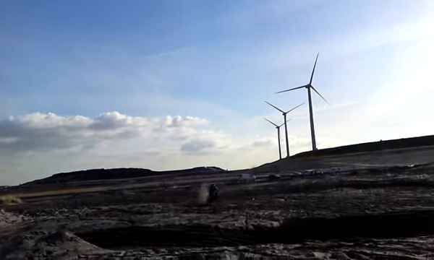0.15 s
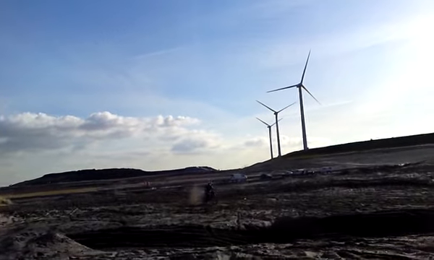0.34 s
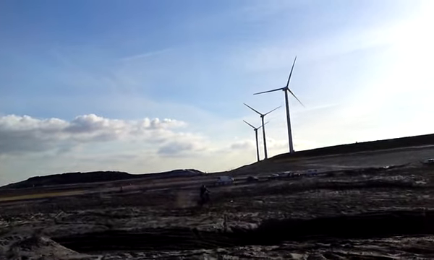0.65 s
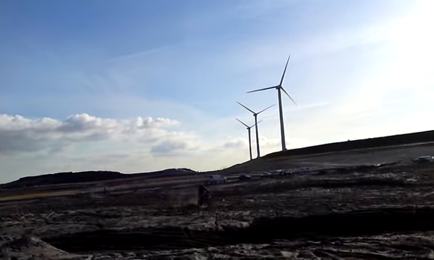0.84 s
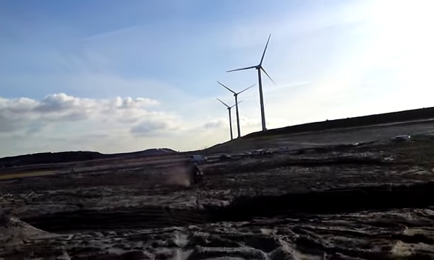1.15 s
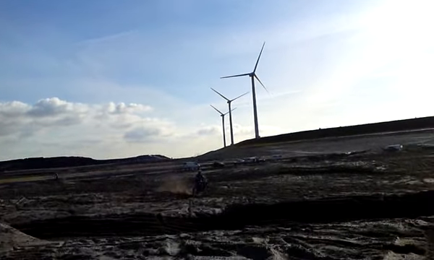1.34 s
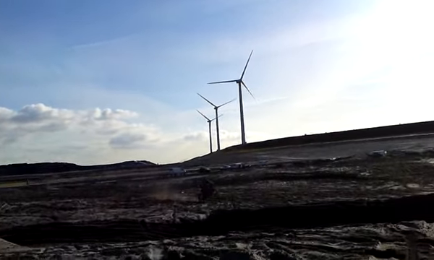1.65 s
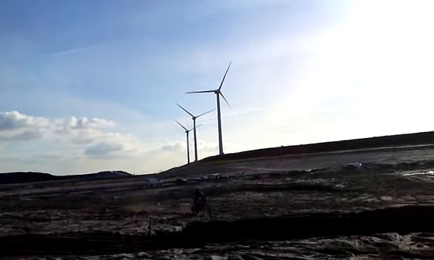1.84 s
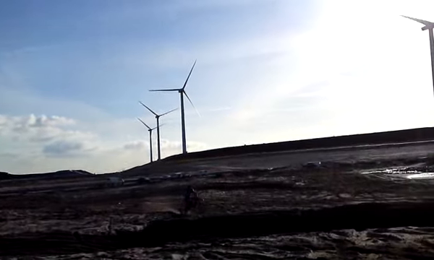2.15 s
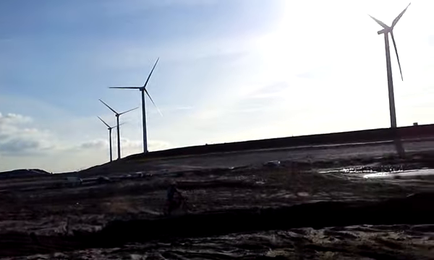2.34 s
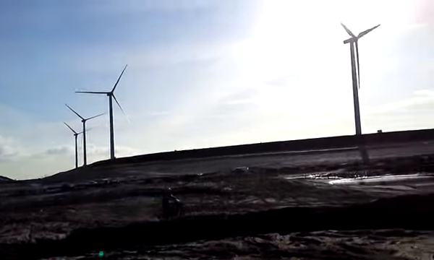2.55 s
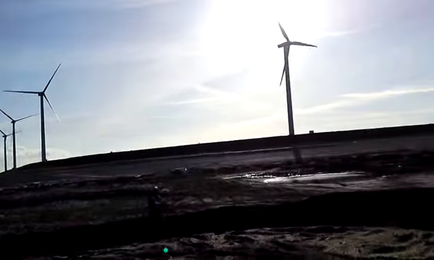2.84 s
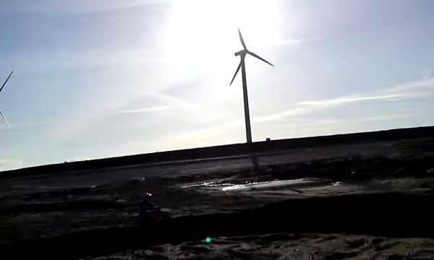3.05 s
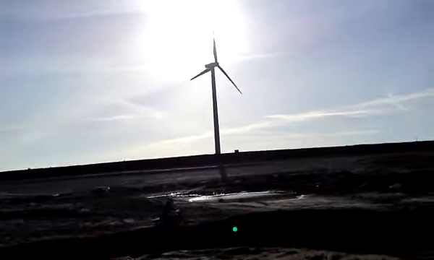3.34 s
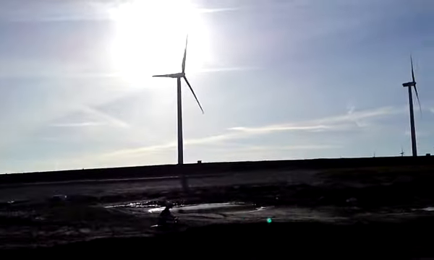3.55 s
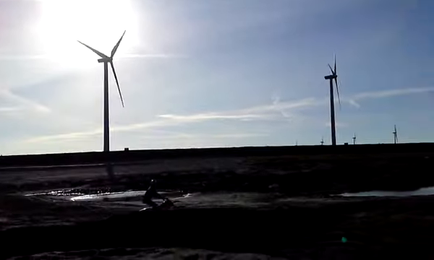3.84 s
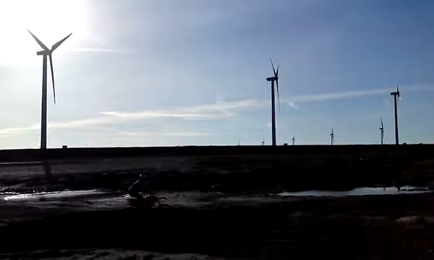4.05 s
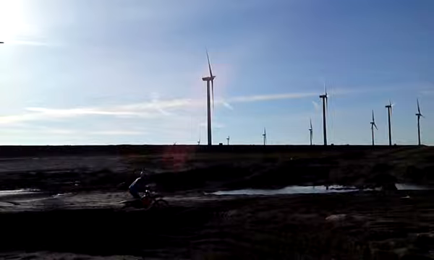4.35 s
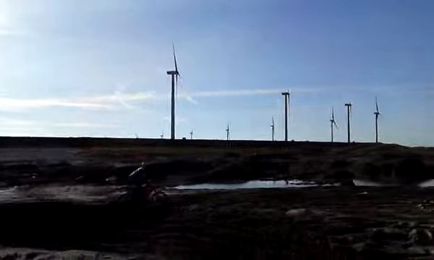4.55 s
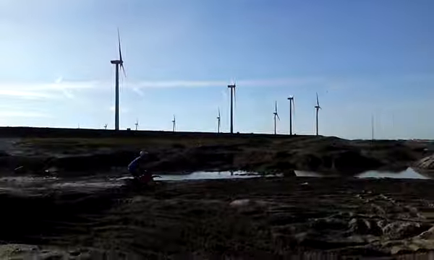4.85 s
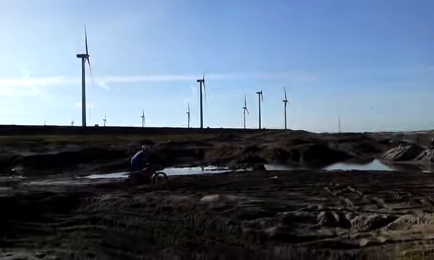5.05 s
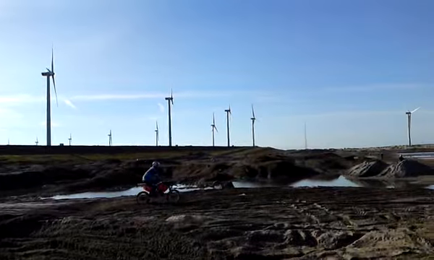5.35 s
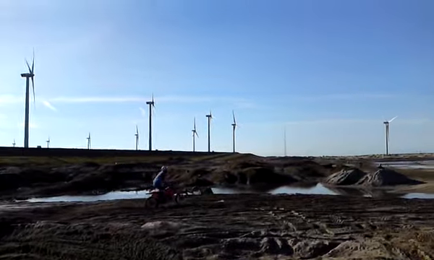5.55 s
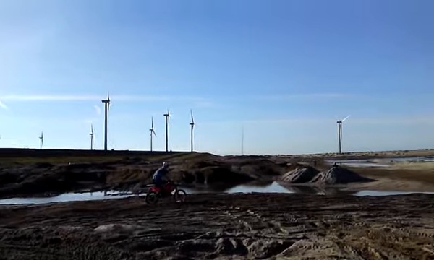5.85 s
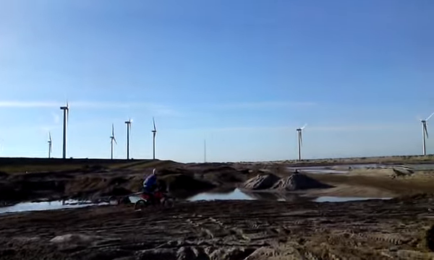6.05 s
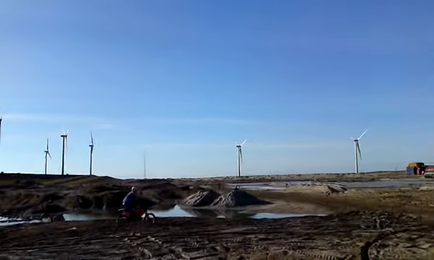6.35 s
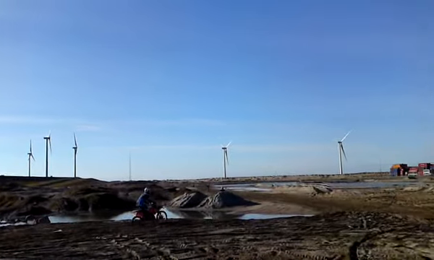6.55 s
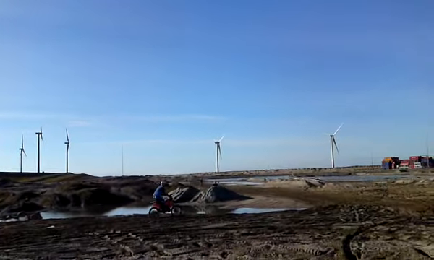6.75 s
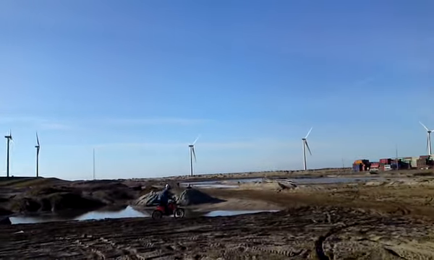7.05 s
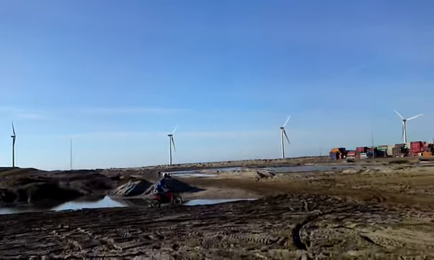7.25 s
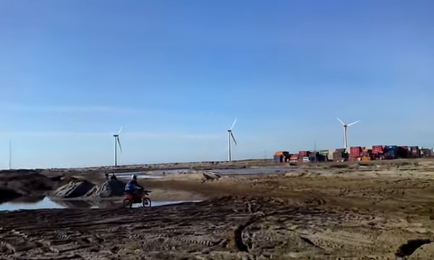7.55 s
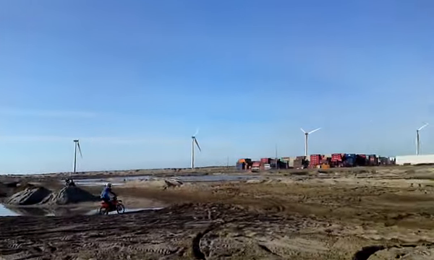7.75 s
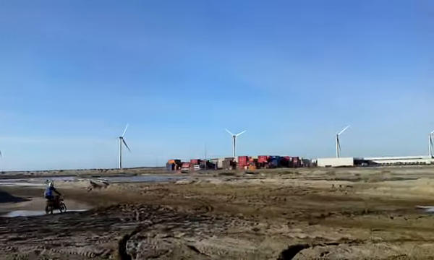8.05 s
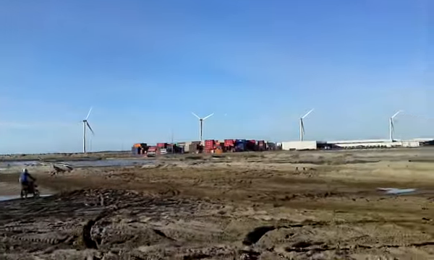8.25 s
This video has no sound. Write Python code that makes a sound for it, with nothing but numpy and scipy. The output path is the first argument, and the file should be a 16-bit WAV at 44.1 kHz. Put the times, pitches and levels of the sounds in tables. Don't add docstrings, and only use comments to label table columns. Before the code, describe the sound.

Harsh buzzing two-stroke motorcycle revs up and sags, crackles past on part throttle, then recedes over faint wind and distant traffic.

```python
import sys
import numpy as np
from scipy import signal
from scipy.io import wavfile
from scipy.ndimage import uniform_filter1d, minimum_filter1d

SR = 44100
rng = np.random.default_rng(int(sys.argv[2]) if len(sys.argv) > 2 else 0)


def level_to_linear(level):
    exponent = np.asarray(level, float) / 20
    return 10 ** exponent


def int16_out(signal):
    q = np.round(np.clip(np.atleast_2d(signal).T, -1, 1) * 32767)
    wavfile.write(sys.argv[1], SR, q.astype(np.int16))


N = 369558

# [f/Hz, bandwidth/Hz, level/dB]
PIPE_MODES = [(320, 163, -8.5), (700, 213, -1), (895, 320, -1), (1080, 320, -1), (1344, 300, -3.5),
              (1920, 45, 0)]
# [t/s, heading (0 coming, 1 side-on, 2 leaving)]
HEADING_PATH = [(0, 0), (1, 0.44), (2.9, 0.43), (3.5, 0.85), (6.3, 0.85), (6.9, 1.22), (7.6, 1.5),
                (8.4, 2.5)]


def rms_one(x):
    return x / np.sqrt(np.mean(x ** 2) + 1e-20)


def even(x, span_s):
    return x / np.sqrt(uniform_filter1d(x * x, int(span_s * SR)) + 1e-12)


def in_time(rows):
    s, *columns = np.transpose(rows)
    return [np.interp(np.arange(N) / SR, s, c) for c in columns]


def drift(rate):
    step, settle = 40, 2000
    r = np.exp(-2 * np.pi * step * rate / SR)
    white = rng.standard_normal(N // step + settle + 2)
    slow = signal.lfilter([1], [1, -2 * r, r * r], white)[settle:]
    return np.interp(np.arange(N) / step, np.arange(len(slow)), rms_one(slow))


def resonate(x, hz, width_hz):
    r = np.exp(-np.pi * width_hz / SR)
    poles = [1, -2 * r * np.cos(2 * np.pi * hz / SR), r * r]
    return signal.lfilter(np.array([1, 0, -1]) * (1 - r * r) / 2, poles, x + 1e-18)


def bands(spectra, blend, low_hz, step, count, patchy_db):
    edges = low_hz * 2 ** (step * np.arange(count + 1))
    centres = np.sqrt(edges[1:] * edges[:-1])
    white = rng.standard_normal((2, N))
    out = np.empty((count, N))
    level_db = np.array([np.interp(np.log(centres), np.log(hz), db) for hz, db in map(np.transpose, spectra)])
    for k in range(count):
        blended_db = np.interp(blend, np.arange(len(spectra)), level_db[:, k])
        gain = level_to_linear(blended_db + patchy_db * drift(9.0))
        band = signal.butter(2, edges[k:k + 2], "band", fs=SR, output="sos")
        out[k] = gain * signal.sosfilt(band, white[k % 2])
    return centres, out


def ground():
    # [f/Hz, level/dB per Hz]
    ground_spectrum = [(15, -47), (25, 8), (129, 3), (487, -13), (686, -3.5), (1790, -2), (2230, -5.5),
                       (4540, 2), (6720, -41.5), (7780, -10), (8800, -27), (11400, -57), (19400, -120)]
    noise = bands([ground_spectrum], 0, 29.85, step=1 / 2, count=16, patchy_db=3.0)[1]
    return level_to_linear(-37) * rms_one(noise.sum(0))


def far_engine():
    # [t/s, f/Hz, level/dB]
    far_drone = [(7.08, 189.4, -57), (7.114, 183.5, -49), (7.174, 212.7, -49.5), (7.26, 216, -52),
                 (7.55, 202.8, -49)]
    hz, level_db = in_time(far_drone)
    s = np.arange(N) / SR
    fade_in = np.clip((s - far_drone[0][0]) / 0.051, 0, 1)
    fade_out = np.clip((far_drone[-1][0] - s) / 0.057, 0, 1)
    angle = 2 * np.pi * np.cumsum(hz) / SR
    orders = np.sin(angle) + level_to_linear(-2.0) * np.sin(2 * angle)
    return fade_in * fade_out * level_to_linear(level_db + 4.5) * orders


def throttle():
    # [open t/s, end t/s, rasp level at open/dB, rasp level
    # at end/dB, crank at end f/Hz]
    throttle_pulls = [(0, .28, -24.5, -40, 79.9), (.28, .49, -31, -29, 82.1), (.49, .77, -32.5, -34, 75.3),
                      (.77, .93, -30.5, -20, 83.03), (.93, 1.15, -19, -13.5, 108), (1.15, 1.21, -11, -9, 148),
                      (1.21, 1.31, -9.5, -8, 160.1), (1.31, 1.59, -8.5, -11, 148),
                      (1.59, 1.84, -12, -4.5, 162), (1.84, 1.975, -2, -10, 164.6),
                      (2.15, 2.36, -17, -8, 116.1), (2.36, 2.555, -6.5, -10.5, 153.7),
                      (2.625, 2.78, -12.5, -8, 152.1), (2.78, 2.87, -12.5, -13, 140),
                      (3.43, 3.685, -30.5, -25, 88), (3.83, 4.159, -25, -24, 108.1),
                    (4.25, 4.558, -35, -37, 70.8), (4.561, 4.73, -27.5, -25, 70.84),
                    (4.96, 5.2, -32, -25, 77.2), (5.199, 5.44, -24, -27.5, 64.1),
                    (5.5, 5.79, -22.5, -16.5, 82.9), (5.789, 6.049, -17, -27.5, 65.76),
                    (6.08, 6.26, -22, -19, 76), (6.259, 6.49, -19.5, -8, 111.3),
                    (6.49, 6.633, -7.5, -18, 83.07), (7.4, 7.621, -34, -23, 58.7),
                    (7.62, 7.951, -26.5, -24, 66.5), (7.949, 8.399, -27, -28.5, 59.16)]
    start_hz, idle_hz, sag_s = 87.06, 70.75, .15
    shut_drop_db, shut_s, fade_db_per_s, coast_db = 5.5, 0.0073, 86.5, -38.5
    s, hz, db = np.arange(N) / SR, np.full(N, start_hz), np.zeros(N)
    pulls = throttle_pulls
    next_opens = [pull[0] for pull in pulls[1:]] + [N / SR]
    for (open_s, end_s, open_db, end_db, end_hz), next_s in zip(pulls, next_opens):
        part = slice(max(int(open_s * SR), 0), int(next_s * SR) + 1)
        shut = np.maximum(s[part] - end_s, 0)
        sag = np.exp(-shut / sag_s)
        driven_hz = np.interp(s[part], [open_s, end_s], [hz[part][0], end_hz])
        hz[part] = sag * driven_hz + (1 - sag) * idle_hz
        fall_db = shut_drop_db * (1 - np.exp(-shut / shut_s)) + fade_db_per_s * shut
        db[part] = np.maximum(np.interp(s[part], [open_s, end_s], [open_db, end_db]) - fall_db, coast_db)
    return uniform_filter1d(hz, size=900), uniform_filter1d(db, size=300)


def whine(turn):
    # [t/s, level/dB]
    whine_levels = [(6.72, -72), (6.9, -49), (7.3, -55), (7.5, -63), (7.9, -55), (8.4, -73)]
    pull_away_s = 7.5
    away = np.clip((np.arange(N) / SR - pull_away_s) / .3, 0, 1)
    flutter = away * 9 * drift(60)
    teeth = np.sin(20 * np.pi * turn) + flutter * np.sin(60 * np.pi * turn)
    return level_to_linear(in_time(whine_levels)[0]) * teeth


def burns():
    # [first t/s, last t/s, first peak level/dB, last peak level/dB, pipe bark level/dB]
    burn_runs = [(.0024, 0.1157, -7, -6.5, -34), (.1804, 0.277, -9, -10, -40),
                 (0.3187, 0.464, -12.5, -10.5, -32.5), (0.515, 0.8343, -14, -9.5, -32.5),
                 (0.8605, .908, -11.5, -7.5, -37), (0.98, 1.03, -10, -8, -42),
                 (3.1624, 3.2983, -17, -20.5, -38), (3.4307, 3.497, -20, -16.5, -33),
                 (3.577, 3.673, -13, -13, -26.5), (3.8303, 3.872, -12, -15, -24),
                 (4.2104, 4.281, -10.5, -11.5, -30), (4.32, 4.387, -12.5, -9.5, -28.5),
                 (4.567, 4.65, -7.5, -9.5, -22.5), (4.685, 4.723, -5.5, -10.5, -27.5),
                 (4.831, 4.895, -16, -12, -31), (4.958, 5.113, -10, -9.5, -24.5),
                 (5.1575, 5.3178, -7.5, -4, -25.5), (5.378, 5.502, -5.5, -7, -28),
                 (5.667, 6.052, -2.5, -6, -26), (6.24, 6.3345, -4.5, -3, -27),
                 (6.9716, 7.007, -19, -21.5, -42), (7.3341, 7.411, -6, -8, -30.5),
                 (7.4716, 7.5963, -13.5, -19, -41)]
    burn_counts = [3, 3, 5, 9, 3, 2, 3, 3, 2, 2, 2, 2, 3, 2, 2, 6, 5, 5, 11, 3, 2, 2, 3]
    # [t/s, peak level/dB, pipe bark level/dB]
    lone_burns = [(4.9244, -25, -29), (2.151, -4, -38), (2.578, -7, -37), (5.3463, -15, -35),
                  (6.6013, 2.5, -25), (6.7868, -21, -38), (7.9677, -22, -45), (8.0307, -11.5, -46)]
    rows = []
    for (first, last, db_0, db_1, bark_db), count in zip(burn_runs, burn_counts):
        for u in np.linspace(0, 1, num=count):
            rows.append((first + (last - first) * u, db_0 + (db_1 - db_0) * u, bark_db, 0 < u < 1))
    rows = np.array(rows)
    scatter_db = rng.standard_normal((len(rows), 2)) * [1.0, 2.0] * rows[:, 3:]
    return np.vstack([np.column_stack([rows[:, 0], rows[:, 1:3] + scatter_db]), lone_burns])


def struck(pops, column, offset_db):
    clicks = np.zeros(N)
    clicks[(pops[:, 0] * SR).astype(int)] = level_to_linear(pops[:, column] + offset_db)
    return clicks


def cone(hits):
    end_hz, fall_hz, fall_s, ring_s = 640, 434, .009, .011
    s = np.arange(SR // 20) / SR
    cycles = end_hz * s + fall_hz * fall_s * (1 - np.exp(-s / fall_s))
    ring = level_to_linear(-37.5) * np.exp(-s / ring_s) * np.sin(2 * np.pi * cycles)
    crack = level_to_linear(-25) * np.exp(-s / .00008)
    return signal.oaconvolve(hits, ring + crack)[:N]


def singing(turn, hz):
    out = 0
    for k in range(4, 13):
        pipe = sum(level_to_linear(db) / (1 + (2 * (k * hz - f) / width) ** 2) ** 2 for f, width, db in PIPE_MODES)
        rolloff = np.minimum(600 / (k * hz), 1) ** 1.4
        tone = np.sin(2 * np.pi * (k * turn + rng.random()))
        out = out + pipe * rolloff * level_to_linear(3.5 * drift(5)) * tone
    return even(out, 0.28)


def ring_pipe(x):
    out = 0
    for k, (f, width, db) in enumerate(PIPE_MODES):
        out = out + (-1) ** k * level_to_linear(db) * resonate(resonate(x, f, width), f, 2 * width)
    return out


def exhaust(turn, hz, pops, rough, bark_db, boom_db):
    boom_hz, boom_width_hz = 184, 42
    port = np.diff(np.floor(turn), prepend=0)
    strength = 1 + rng.standard_normal(int(turn[-1]) + 1)[turn.astype(int)]
    puff = 0.32 * rng.standard_normal(N) * np.exp(-2.5 * (turn % 1))
    orders = 0
    for k in (1, 2, 3):
        orders = orders + np.sin(2 * np.pi * k * turn) / (1 + ((k * hz - boom_hz) / boom_width_hz) ** 2)
    lumps = resonate(resonate(puff, boom_hz, 210), boom_hz, 300)
    clean_boom = np.sqrt(1 - rough) * even(orders, .05) * level_to_linear(2 * drift(10))
    boom = clean_boom + np.sqrt(rough) * .8 * even(lumps, .2)
    rough_bark = np.sqrt(rough) * even(ring_pipe(port * strength + puff), .08)
    steady = (1 - rough) * singing(turn, hz) + rough_bark
    hits = struck(pops, column=2, offset_db=34)
    tail = np.exp(-np.arange(SR // 20) / (0.0087 * SR))
    hiss = .11 * rng.standard_normal(N) * signal.oaconvolve(hits, tail)[:N]
    dull = signal.butter(1, 850, fs=SR, output="sos")
    knocks = signal.sosfilt(dull, ring_pipe(0.42 * hits + hiss))
    return level_to_linear(bark_db) * steady + knocks + cone(hits) + level_to_linear(boom_db - 3.5) * boom


def rasp(turn, pops, lower_db, upper_db):
    # [f/Hz, bandwidth/Hz, level/dB]
    shell_modes = [(1879, 47, -17), (2535, 46, -24), (3330, 62, -19), (3780, 45, -8), (4414, 60, -6),
                   (5513, 66, -13.5)]
    # [f/Hz, level/dB per Hz]
    coming = [(820, -52), (1400, -19.5), (2040, -20.5), (2200, -27), (2860, -22.5), (3310, -29.5),
              (3440, -16.5), (3780, -11.5), (4080, -2.5), (4720, 2.5), (7430, -9), (7960, -18),
              (8800, -21.5), (11400, -56), (19400, -120)]
    # [f/Hz, level/dB per Hz]
    side_on = [(820, -47), (1400, -18), (1700, -13.5), (1920, -13), (2120, -13.5), (2440, -25.5),
               (2650, -8.5), (3440, -12.5), (4270, -2.5), (5760, 1.5), (6320, 7.5), (7840, -5), (8800, -14),
               (11400, -53), (19400, -120)]
    # [f/Hz, level/dB per Hz]
    leaving = [(820, -49), (1400, -19), (1450, -18.5), (1890, -8.5), (2240, -28.5), (2530, -3.5),
               (2860, -15.5), (3190, -4), (3920, -12), (4790, -4.5), (5990, 3), (7600, -7.5), (8800, -22),
               (11400, -56), (19400, -120)]
    split_hz = 5300
    heading = in_time(HEADING_PATH)[0]
    centres, noise = bands([coming, side_on, leaving], heading, 1400, step=1 / 6, count=16, patchy_db=1.53)
    jet = rng.standard_normal(N)
    shell = 0
    for hz, width, db in shell_modes:
        mode = rms_one(resonate(resonate(jet, hz, width), hz, width))
        shell = shell + level_to_linear(db + 3.95 * drift(5.8)) * mode
    fins_hz = np.geomspace(4100, 7600, num=12) * (1 + .02 * rng.standard_normal(12))
    fins = sum(level_to_linear(4.5 * drift(4)) * resonate(jet, hz, 60) for hz in fins_hz)
    shell_db = -6 - 6 * (np.minimum(heading, 1.4) - 1) ** 2
    lower = even(noise[centres < split_hz].sum(0), .4) + level_to_linear(shell_db) * shell
    upper = even(noise[centres >= split_hz].sum(0), 0.46) + level_to_linear(-4) * rms_one(fins)
    colour = rms_one(lower) + level_to_linear(upper_db - lower_db) * upper
    throb = 1 + 0.15 * (np.exp(-3.0 * (turn % 1)) * 3 - 1)
    s = np.arange(SR // 5) / SR
    shape = np.exp(-(s / 0.026) ** 1.9) + 0.12 * np.exp(-s / 0.051)
    burst = signal.oaconvolve(struck(pops, column=1, offset_db=-13), shape)[:N]
    return colour * np.hypot(level_to_linear(lower_db) * throb, burst)


def scene():
    # [t/s, roughness 0-1]
    firing_roughness = [(0, .4), (1.12, .25), (1.3, .7), (2.05, .6), (2.2, .22), (2.56, .55), (2.78, .3),
                        (3.1, .75), (3.4, .7), (3.55, .25), (4.15, .15), (4.3, .8), (5.4, .75), (5.68, .3),
                        (6.08, .7), (6.4, .15), (6.62, .7), (7.7, .55)]
    # [heading 0-2, upper rasp over lower/dB, bark/dB, boom/dB at a rasp of 0 dB]
    directivity = [(.24, 1, -25.5, -25), (.35, 4, -31, -27), (.41, 0.5, -21, -25), (.46, -0.5, -20, -31),
                   (0.838, -2, -15, -26.5), (.85, -0.5, -18, -28), (1.05, -3, -22, -38.5),
                   (2, 3.5, -20.5, -33)]
    hz, rasp_db = throttle()
    turn = np.cumsum(hz * (1 + .004 * drift(15))) / SR
    rough, pops = in_time(firing_roughness)[0], burns()
    angle, *facing = np.transpose(directivity)
    tilt_db, bark_db, boom_db = [np.interp(in_time(HEADING_PATH)[0], angle, c) for c in facing]
    bark_db = bark_db + 0.78 * rasp_db + 6.5 * (.5 - rough)
    boom_db = boom_db + 0.63 * rasp_db + 10.5 * (1 - rough)
    bike = rasp(turn, pops, rasp_db, rasp_db + tilt_db)
    bike = bike + exhaust(turn, hz, pops, rough, bark_db, boom_db) + whine(turn)
    return (bike + far_engine() + ground())[None]


def band_limit(x):
    return signal.sosfilt(signal.butter(12, 16820, fs=SR, output="sos"), x)


def record(dry):
    overload, mic_top_hz = .74, 8300
    x = signal.sosfilt(signal.cheby1(10, .5, mic_top_hz, fs=SR, output="sos"), dry)
    x = signal.sosfilt(signal.butter(2, 70, "high", fs=SR, output="sos"), x)
    crest = uniform_filter1d(-minimum_filter1d(-np.abs(x), size=3), size=3)
    held = x * np.minimum(1, overload / (crest + 1e-9))
    rumble_band = signal.butter(1, [15, 300], "band", fs=SR, output="sos")
    excess = signal.sosfilt(rumble_band, np.abs(x - held))
    x = held + 0.14 * excess
    x = signal.sosfiltfilt(signal.cheby2(16, 40, 16100, fs=SR, output="sos"), x)
    return band_limit(x)


dry = scene()
out = record(dry)
int16_out(out)
```